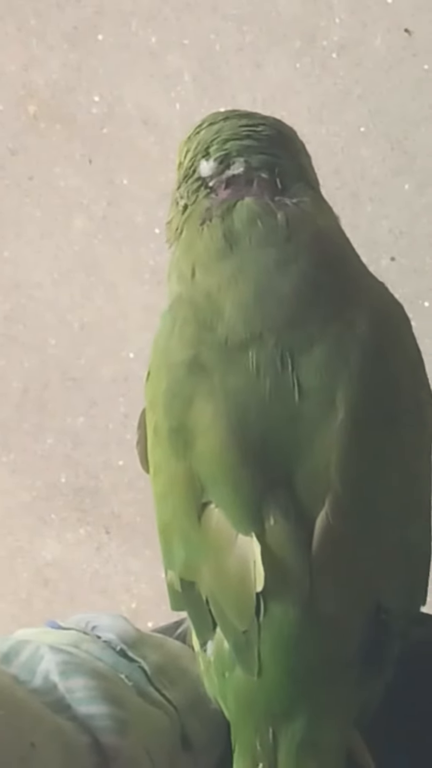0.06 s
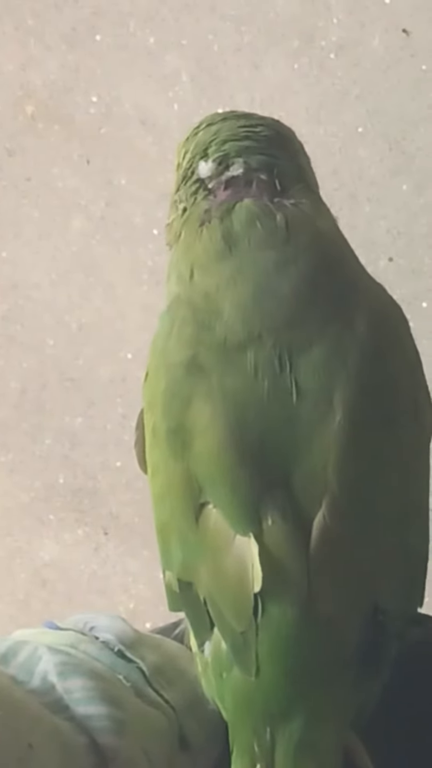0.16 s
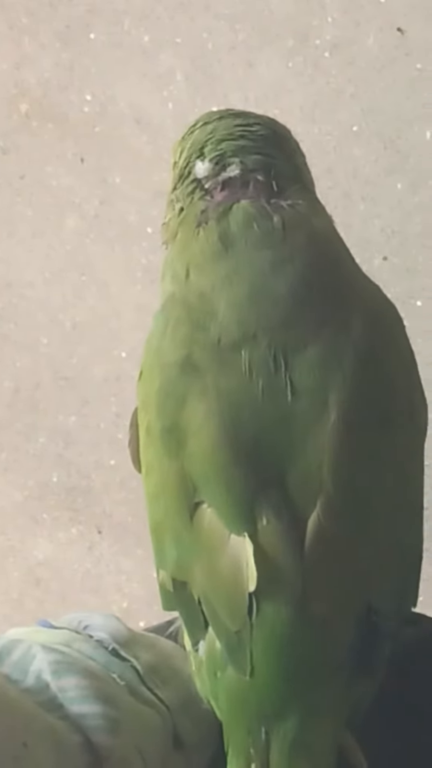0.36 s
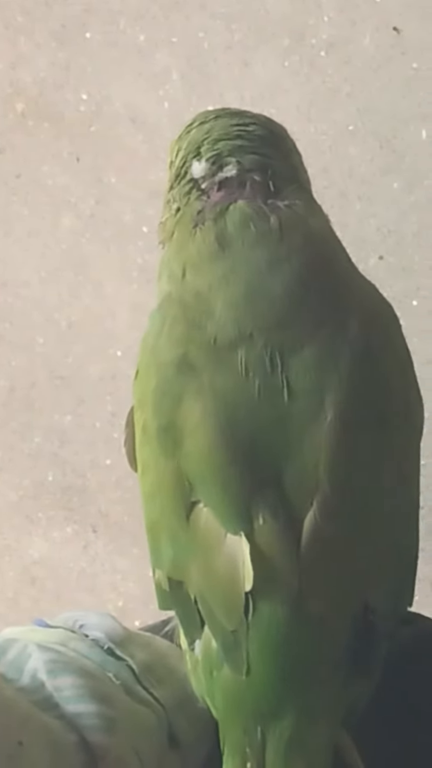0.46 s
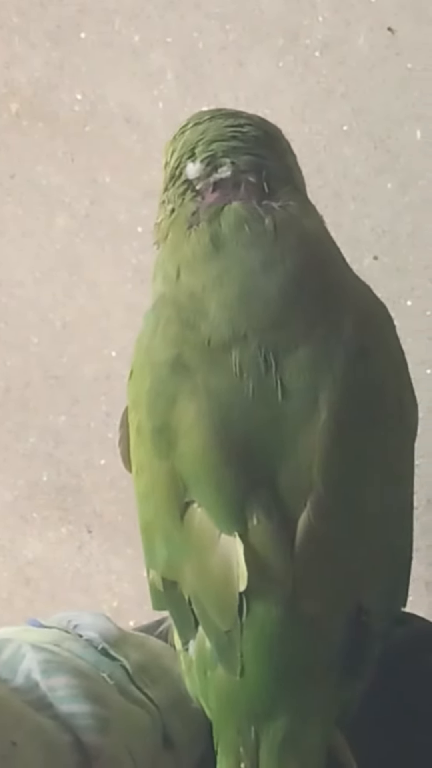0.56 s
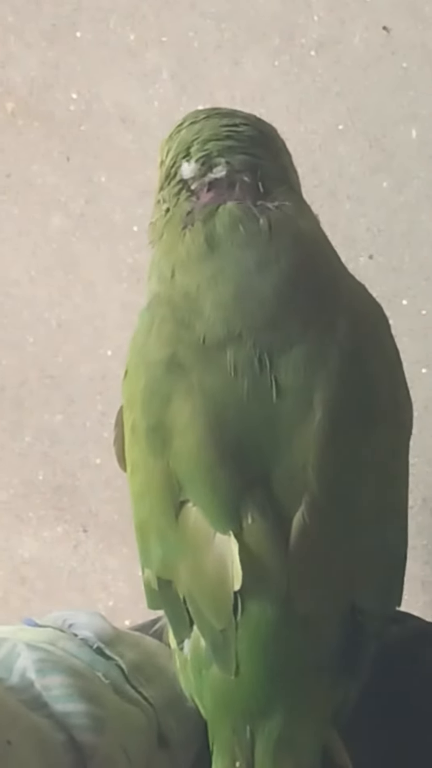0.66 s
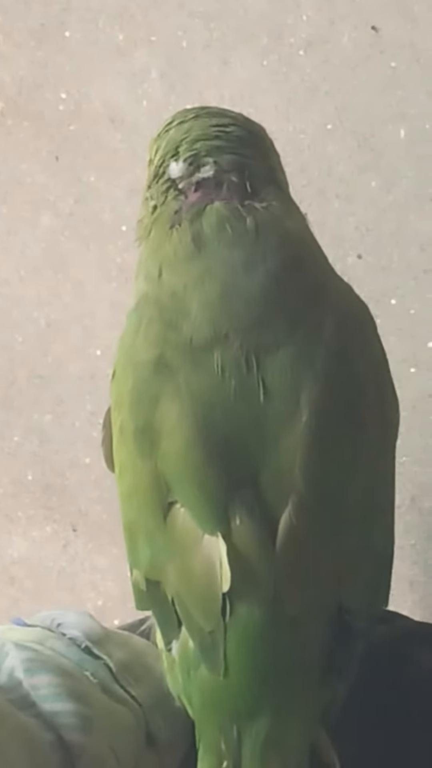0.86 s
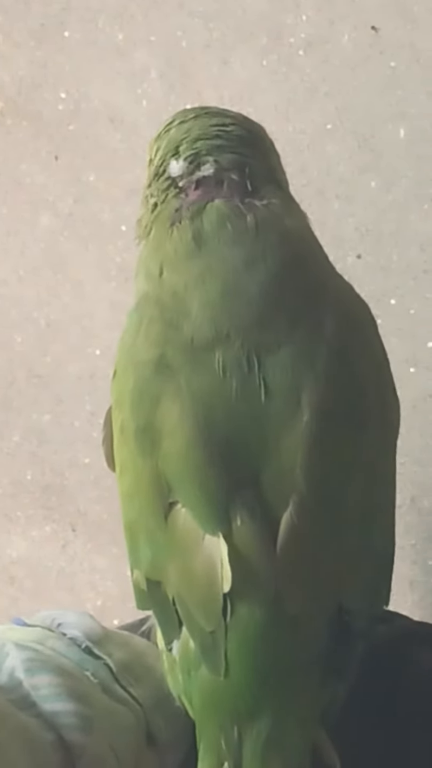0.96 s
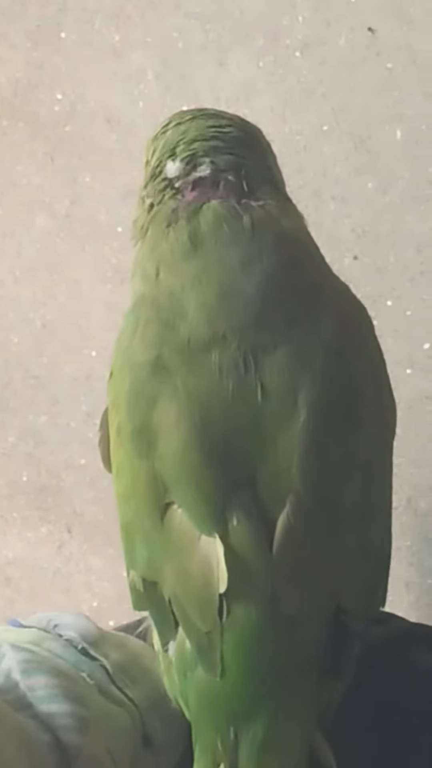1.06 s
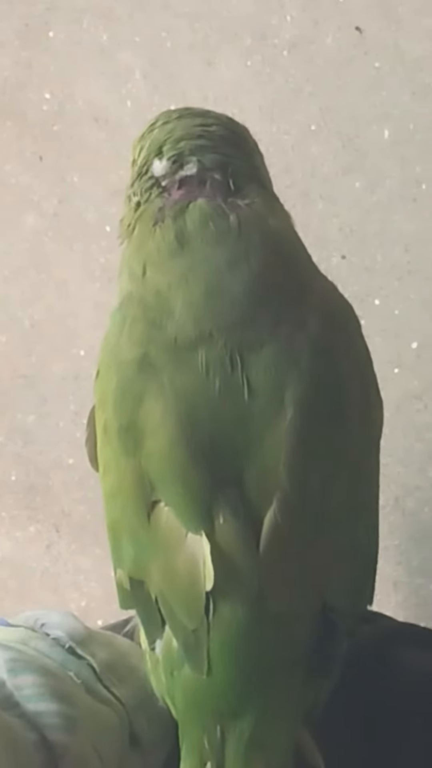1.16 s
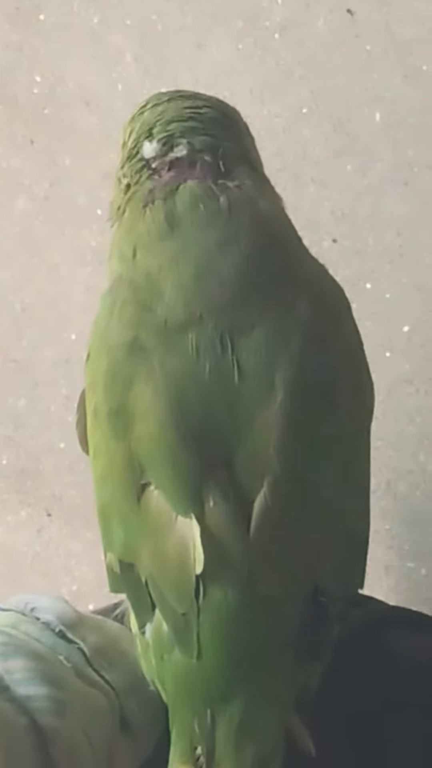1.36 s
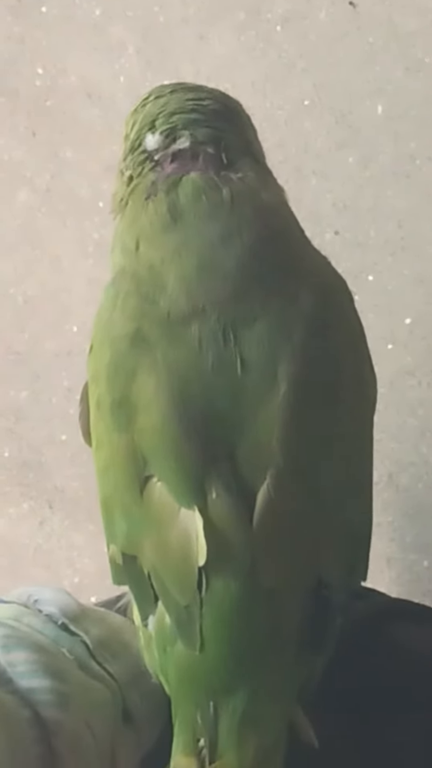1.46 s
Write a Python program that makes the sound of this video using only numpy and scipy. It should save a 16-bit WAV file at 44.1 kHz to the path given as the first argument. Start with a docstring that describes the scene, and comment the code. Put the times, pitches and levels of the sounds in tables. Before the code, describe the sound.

A small parrot gives one raspy call close by in a slightly echoing room. It starts at about 0.2 seconds as a high, grating run of rapid croaks with hiss, is loudest around 0.7 seconds, and ends in a short scrape by 0.9 seconds. Steady low room noise runs throughout, with faint hums during the call and a soft rumble swelling until about 1.5 seconds.

```python
"""A small parrot's raspy call

A parrot calls once, close by, in a room with steady noise, a low rumble and faint swelling hums.
Its voice organ, the syrinx, flutters unevenly: each flap is a tiny falling chirp near 3 kHz with a
puff of hiss, over a lower grating band. About thirty times a second the voice catches in a falling
croak, loudest near the end, and the call closes in a broad scrape."""
import sys
import numpy as np
from scipy import signal
from scipy.fft import rfft, irfft, next_fast_len
from scipy.io import wavfile
from scipy.ndimage import map_coordinates

SR = 44100
rng = np.random.default_rng(int(sys.argv[2]) if len(sys.argv) > 2 else 0)


def master_out(mix):
    """Clip the mix to full scale and print it as 16-bit PCM to the path in sys.argv[1]."""
    frames = np.transpose(np.atleast_2d(mix))
    ceiling = np.clip(frames, -1, 1)
    pcm = np.round(ceiling * 32767).astype(np.int16)
    wavfile.write(sys.argv[1], SR, pcm)


N = 66150  # 1.5 seconds


def amp(db):
    """Turn decibels into a gain."""
    return 10 ** (np.asarray(db) / 20)


def unit(x):
    """Scale a signal to an average (rms) level of 1."""
    return x / np.sqrt(np.mean(x ** 2) + 1e-20)


def along(points, hz):
    """Read a table of (freq_hz, value) points on a log frequency axis."""
    freqs, values = np.transpose(points)
    return np.interp(np.log(hz + 1), np.log(freqs + 1), values)


def curves(rows):
    """Join a table's timed points with lines: one curve for each column after the time."""
    times, *columns = np.transpose(rows)
    return [np.interp(np.arange(N) / SR, times, column) for column in columns]


def sounding(rows):
    """On between a table's first and last time, off elsewhere."""
    t = np.arange(N) / SR
    return (t > rows[0][0]) & (t < rows[-1][0])


def wobble(per_s):
    """A smooth curve through per_s random values a second."""
    return map_coordinates(rng.standard_normal(N), [np.arange(N) * per_s / SR], mode="wrap")


def filtered(x, response):
    """Multiply each frequency in x by response(hz)."""
    size = next_fast_len(N + SR // 2)
    return irfft(rfft(x, size) * response(np.fft.rfftfreq(size, 1 / SR)), size)[..., :N]


def coloured(x, colour):
    """Turn frequencies up or down by a table of (freq_hz, gain_db)."""
    return filtered(x, lambda hz: amp(along(colour, hz)))


def noise(colour):
    """Noise of level 1 with the given tone colour."""
    return unit(coloured(rng.standard_normal(N), colour))


def add(track, start_s, sound):
    """Mix a sound into a track."""
    part = track[int(start_s * SR):][:len(sound)]
    part += sound[:len(part)]


def panned(stereo, balance):
    """Lean each frequency to the left or right."""
    return filtered(stereo, lambda hz: amp(np.outer([.5, -.5], along(balance, hz))))


# How alike the room noise is on both sides (1 = the same): freq_hz, likeness
NOISE_LIKENESS = [(60, 1), (130, 0.82), (290, 0.82), (640, 0.3), (1410, -0.34), (3100, 0.047),
                  (10000, -0.068)]
# Which side the room noise favours: freq_hz, left_over_right_db
NOISE_BALANCE = [(60, 2.5), (200, -0.5), (400, 1.5), (1300, -0.5), (4400, -3), (8100, -6.5), (15000, 11.5)]
def spread_noise(colour):
    """Noise from all around: alike on both sides in the bass, unrelated in the treble."""
    def shares(hz):
        angle = np.arccos(np.clip(along(NOISE_LIKENESS, hz), -1, 1)) / 2
        return np.array([np.cos(angle), np.sin(angle)])
    mid, side = filtered(np.array([noise(colour), noise(colour)]), shares)
    return unit(panned(np.array([mid + side, mid - side]), NOISE_BALANCE))


# Tone colour of the steady noise: freq_hz, gain_db
STEADY_COLOUR = [(20, -64), (40, -45), (60, -28), (75, -24.5), (88, -26), (105, -6.5), (135, -9.5),
                 (170, -11.5), (215, -7), (280, -8.5), (370, -6.5), (480, -12), (740, -10), (1050, -14),
                 (1300, -11.5), (2200, -15.5), (3200, -24), (3900, -30.5), (5600, -33), (7300, -44),
                 (10500, -48), (12200, -41), (15500, -53.5)]
# Swells of the rumble: time_s, level_db
RUMBLE_LEVEL = [(0, -58), (.3, -57.5), (.7, -51), (.92, -61), (1.1, -52), (1.28, -49.5), (1.5, -52)]
# Tone colour of the rumble: freq_hz, gain_db
RUMBLE_COLOUR = [(30, -80), (120, -34), (220, -9.5), (290, 0), (370, -2), (470, -22.5), (800, -51)]
def room_noise():
    """Steady noise and a low rumble that slowly swells."""
    steady = amp(-46) * spread_noise(STEADY_COLOUR)
    rumble = amp(curves(RUMBLE_LEVEL)[0]) * spread_noise(RUMBLE_COLOUR)
    return steady + rumble


# Faint held tones: start_s, length_s, pitch_hz, level_db
HUM_NOTES = [(.172, 0.21, 156.7, -51.5), (.47, 0.27, 155.6, -48), (0.623, .32, 576, -55.5)]
def hums():
    """Wavering hums swell and fade over a faint low tone that never stops."""
    def tone(pitch_hz, waver):
        hz = pitch_hz * (1 + waver * wobble(per_s=12))
        return np.sin(2 * np.pi * np.cumsum(hz) / SR)
    out = amp(-67) * tone(pitch_hz=108.6, waver=0.031)
    for start_s, length_s, pitch_hz, level_db in HUM_NOTES:
        swell = np.sin(np.linspace(0, np.pi, int(length_s * SR)))
        add(out, start_s, amp(level_db) * swell * tone(pitch_hz, waver=0.0029)[:len(swell)])
    return out


# Time the room's echo takes to fade by 60 dB: freq_hz, fade_s
ECHO_FADE = [(300, 0.96), (1500, 0.51), (3000, 0.39), (6000, 0.32), (12000, 0.28)]
def room_echo(voice, walls_db=-3, tail_db=-5.5, bounces=8):
    """Near walls answer first, then a blur of echoes dies away."""
    hz, t, spectrum = signal.stft(rng.standard_normal((2, SR // 2)), SR, nperseg=256)
    fade = amp(-60 * t / along(ECHO_FADE, hz)[:, None])
    tail = signal.istft(spectrum * fade, SR, nperseg=256)[1]
    tail = amp(tail_db) * tail / np.linalg.norm(tail[0])
    echo = np.pad(tail, ((0, 0), (200, 0)))  # the tail starts 4.5 ms late
    for side in echo:
        for delay_s, sign in zip(rng.uniform(.001, .013, bounces), rng.choice([-1, 1], bounces)):
            side[int(delay_s * SR)] += sign * amp(walls_db) / np.sqrt(bounces)
    return signal.fftconvolve(voice[None], echo, axes=1)[:, :N]


# Tone colour of the tick: freq_hz, gain_db
TICK_TONE = [(50, -60), (200, -25), (600, -2), (1000, 5), (1400, 3), (2100, -14), (3500, -10), (5500, -18),
             (9000, -60)]
def tick(start_s=.806, level_db=-40, rise_s=0.00098, fade_s=.06):
    """A soft dull tick, perhaps the beak closing."""
    t = np.maximum(np.arange(N) / SR - start_s, 0)
    return noise(TICK_TONE) * amp(level_db - 60 * t / fade_s) * (1 - np.exp(-t / rise_s))


def puff(rise_s):
    """The strength of one puff of air: a quick rise, then a slower fall."""
    age = np.arange(SR // 20) / SR / rise_s
    return age * np.exp(1 - age)


# Sharp spits of air near the start of some croaks: start_s, level_db
AIR_SPITS = [(0.284, -49.5), (.56, -39.5), (.57, -46), (.716, -44)]
# Their tone colour: freq_hz, gain_db
SPIT_TONE = [(1500, -30), (3500, 7), (4200, -10), (5600, 1), (6400, -7.5), (7400, -4), (9500, -18.5),
             (14000, -31)]
def spits():
    """Air bursts out as the syrinx snaps open."""
    bursts = np.zeros(N)
    for start_s, level_db in AIR_SPITS:
        add(bursts, start_s, amp(level_db) * puff(rise_s=0.0013))
    return bursts * noise(SPIT_TONE)


def rushing_air(puffs, colour, levels, leak=0.092):
    """Air rushes through the beak with every puff, and a little leaks in between."""
    air = coloured(rng.standard_normal(N) * (leak + puffs), colour)
    return unit(air) * amp(curves(levels)[0]) * sounding(levels)


# Loudness of the hiss: time_s, level_db
HISS_LEVEL = [(.19, -63), (.22, -64), (0.281, -53), (.305, -45.5), (.37, -48), (.56, -47), (.62, -51),
              (.68, -43.5), (.73, -44), (.765, -52.5), (.81, -52.5)]
# Tone colour of the hiss: freq_hz, gain_db
HISS_TONE = [(700, -83), (1200, 7), (1900, 10), (2300, -4.5), (3000, 2), (3900, 0.5), (4170, -8.5),
             (4500, -3.5), (5200, -5), (5800, 0.5), (6300, -10.5), (7400, -9), (9200, -18), (11000, -21.5),
             (11800, -25), (12700, -13.5), (13600, -38), (14500, -53)]
# Loudness of the closing scrape: time_s, level_db
SCRAPE_LEVEL = [(.72, -58), (.765, -45), (.79, -42), (.82, -50), (.855, -53.5), (.875, -70)]
# Tone colour of the scrape: freq_hz, gain_db
SCRAPE_TONE = [(700, -40), (1250, 0), (1900, 0), (2600, -7), (3300, -6), (4100, -24), (8000, -57)]
def beak_air(puffs):
    """Air in the beak hisses through the call and ends in a broad, duller scrape."""
    return rushing_air(puffs, HISS_TONE, HISS_LEVEL) + rushing_air(puffs, SCRAPE_TONE, SCRAPE_LEVEL)


# The lower grating band: time_s, level_db, centre_hz
GRATE_PATH = [(.19, -52, 1401), (.225, -50, 1435), (.285, -44.5, 1432), (.32, -43, 1450), (.355, -42, 1700),
              (.39, -41, 1923), (.47, -45.5, 1924), (.54, -43.5, 1948), (.62, -48.5, 1551), (.7, -47, 1515),
              (.77, -44.5, 1450), (.795, -51.5, 1415), (.85, -47, 1465)]
def grate(puffs, width_hz=470, skirt_hz=1400, skirt_db=-11.5, leak=0.43):
    """A lower resonance, fed by the puffs, that rises in mid-call and sinks again."""
    level_db, centre_hz = curves(GRATE_PATH)
    phase = 2 * np.pi * np.cumsum(centre_hz) / SR
    band = np.zeros(N)
    for wave in (np.cos, np.sin):  # a narrow band of noise on a wider, weaker skirt
        band += (wobble(width_hz) + amp(skirt_db) * wobble(skirt_hz)) * wave(phase)
    return unit(band * (leak + puffs)) * amp(level_db) * sounding(GRATE_PATH)


# What the throat boosts and cuts: freq_hz, gain_db
THROAT_COLOUR = [(1500, 16.5), (2400, -1), (3300, 0.5), (3850, -2.5), (4150, -21), (4700, -9), (5300, 3),
                 (5750, -7), (6300, -26), (7300, -13), (9000, -21)]
def throat(x):
    """The throat colours the chirps, with a sharp dip just above 4 kHz."""
    return coloured(x, THROAT_COLOUR)


def chirp(length_s, first_hz, last_hz, waver, bend=1.776, octave_db=-22.5):
    """One note of the syrinx, falling fast and then levelling off, with a weak octave above."""
    progress = np.linspace(0, 1, max(int(length_s * SR), 8))
    slide_hz = last_hz + (first_hz - last_hz) * (1 - progress) ** bend
    phase = 2 * np.pi * np.cumsum(slide_hz * (1 + waver[:len(progress)])) / SR
    swell = np.sqrt(2) * np.sin(np.pi * progress ** 1.21)
    return swell * (np.sin(phase) + amp(octave_db) * np.sin(2 * phase))


FLAPS_PER_S, FLAP_UNEVENNESS = 160, .25
# The rasp under the croaks, before the throat colours it: time_s, level_db, pitch_hz
RASP_PATH = [(.195, -59, 2750), (.27, -49, 2760), (.335, -50, 2836), (.39, -52, 3240), (.47, -53, 3194),
             (.575, -48.5, 3220), (.635, -48, 3036), (.675, -44, 3090), (.715, -35, 3107),
             (.765, -37.5, 2820), (.8, -62, 2710)]
def rasp(spread_db=4, pitch_scatter=0.0646, give_way=0.6):
    """Uneven flaps of the syrinx: each makes a chirp and puffs air into the grating band and the beak."""
    level_db, pitch_hz = curves(RASP_PATH)
    gaps, sizes, detunes = rng.standard_normal((400, 3)).T
    starts = RASP_PATH[0][0] + np.cumsum(np.exp(FLAP_UNEVENNESS * gaps)) / FLAPS_PER_S
    chirps, puffs = np.zeros(N), np.zeros(N)
    waver = 0.073 * wobble(per_s=1500)
    for start_s, size, detune in zip(starts, sizes, detunes):
        if start_s < RASP_PATH[-1][0] + .2:  # the puffs carry on through the scrape
            i = int(start_s * SR)
            gain = amp(spread_db * np.tanh(size))
            hz = pitch_hz[i] * (1 + pitch_scatter * detune)
            flap = chirp(length_s=0.00657, first_hz=1.22 * hz, last_hz=.89 * hz, waver=waver[i:])
            add(chirps, start_s, gain * flap)
            add(puffs, start_s, gain * puff(rise_s=0.0016))
    chirps = unit(chirps) * amp(level_db) * sounding(RASP_PATH)
    chirps *= 1 - give_way * croaking()  # quieter while the syrinx holds a croak
    return throat(chirps) + beak_air(puffs) + grate(puffs)


# Croaks, before the throat: start_s, length_s, first_hz, last_hz, level_db, flutter (capped at 1)
CROAK_NOTES = [(0.194, 0.021, 2845, 2540, -46.5, 0.34), (.226, 0.036, 3060, 2483, -44, 0.97),
               (0.26, 0.022, 3014, 2360, -40.5, .7), (0.292, .027, 3036, 2306, -36, 0.44),
               (0.321, 0.026, 3455, 2420, -35.5, 0.93), (.362, 0.022, 3560, 2474, -37.5, 0.77),
               (.399, 0.017, 3430, 2670, -40, .7), (0.429, 0.02, 3497, 2650, -37, 0.77),
               (0.467, 0.019, 3340, 2610, -37.5, 0.86), (.502, 0.023, 3384, 2785, -38, 0.74),
               (.54, .018, 3344, 2740, -40, 0.56), (.562, 0.0346, 3468, 2750, -40, .8),
               (0.602, 0.0321, 3320, 2593, -36.5, 0.03), (.645, 0.022, 3197, 2804, -33.5, 0.77),
               (0.679, .034, 3222, 2308, -28, 0.2), (.72, 0.023, 3206, 2330, -27.5, 0.41),
               (0.742, 0.022, 2765, 2330, -37, 0.87), (.76, .018, 2980, 2385, -42, 1.1)]
# Single hard flaps among the croaks, before the throat: start_s, pitch_hz, level_db
HARD_FLAPS = [(.282, 3020, -38.5), (.312, 2552, -30), (0.414, 3210, -38.5), (.451, 3260, -39),
              (.486, 3070, -37), (.63, 2950, -35), (.664, 3000, -32.5), (.673, 3275, -34)]
def croaks(flutter_depth=.9, pitch_swing=.09):
    """The voice catches and slides down; flutter chops each slide into short chirps."""
    out = np.zeros(N)
    waver = .035 * wobble(per_s=900)
    flap_hz = FLAPS_PER_S * (1 + FLAP_UNEVENNESS * wobble(FLAPS_PER_S))
    for start_s, length_s, first_hz, last_hz, level_db, flutter in CROAK_NOTES:
        i, flutter = int(start_s * SR), np.clip(flutter, 0, 1)
        flap_phase = 2 * np.pi * np.cumsum(flap_hz[i:]) / SR
        swing = flutter * pitch_swing * np.sin(flap_phase)
        note = chirp(length_s, first_hz, last_hz, waver[i:] + swing)
        chop = unit(1 - flutter_depth * flutter * np.cos(flap_phase[:len(note)]))
        add(out, start_s, amp(level_db) * note * chop)
    for start_s, hz, level_db in HARD_FLAPS:
        i = int(start_s * SR)
        flap = chirp(length_s=0.00773, first_hz=1.186 * hz, last_hz=.905 * hz, waver=waver[i:])
        add(out, start_s, amp(level_db) * flap)
    return throat(out)


def croaking():
    """A curve that rises from 0 to 1 and back during each croak."""
    held = np.zeros(N)
    for start_s, length_s, *_ in CROAK_NOTES:
        add(held, start_s, np.sin(np.linspace(0, np.pi, int(length_s * SR))))
    return held.clip(0, 1)


# Which side the bird and its echo favour: freq_hz, left_over_right_db
PARROT_BALANCE = [(1000, 1.5), (1500, -6), (2200, 0.5), (3100, -2), (4600, -7), (5900, -4.5), (7500, -12),
                  (9800, 1.5), (12000, 2)]
def parrot(lead_s=0.00033):
    """The bird and its echo. It sits a little to one side, so the left microphone hears it first."""
    voice = rasp() + croaks() + spits() + tick()
    direct = filtered(voice, lambda hz: np.exp(1j * np.pi * lead_s * np.outer([1, -1], hz)))
    return panned(direct + room_echo(voice), PARROT_BALANCE)


def scene():
    """The call over the room's background."""
    return parrot() + hums() + room_noise()


def record(dry):
    """The recorder keeps nothing above 15.7 kHz."""
    return filtered(dry, lambda hz: hz < 15700)


dry = scene()
out = record(dry)
master_out(out)
```